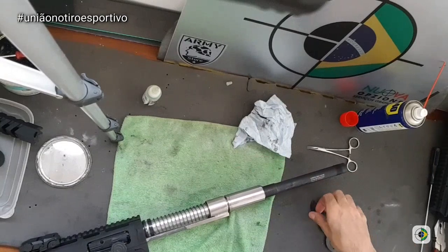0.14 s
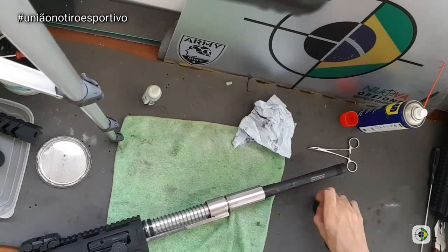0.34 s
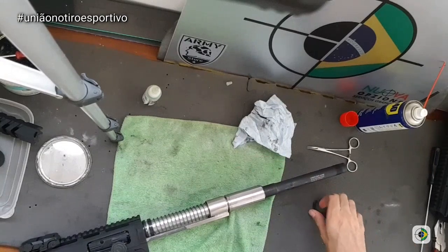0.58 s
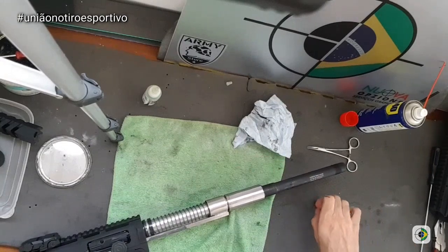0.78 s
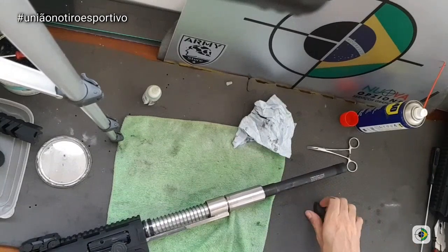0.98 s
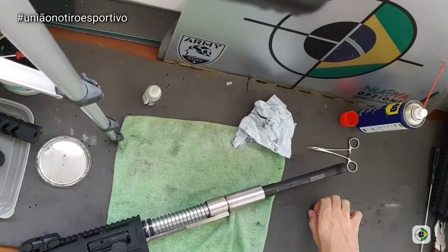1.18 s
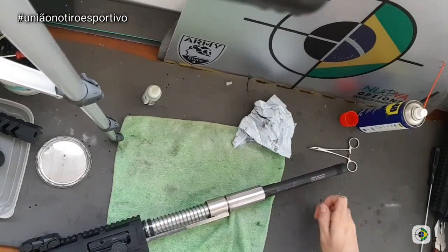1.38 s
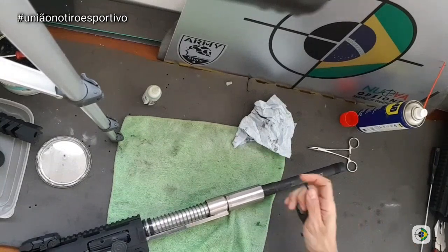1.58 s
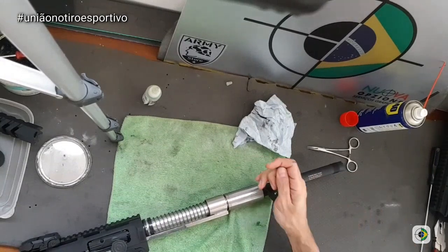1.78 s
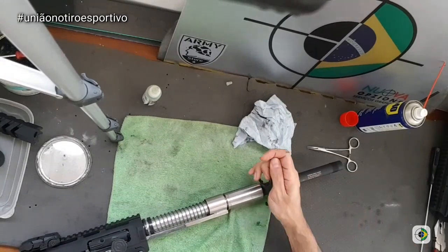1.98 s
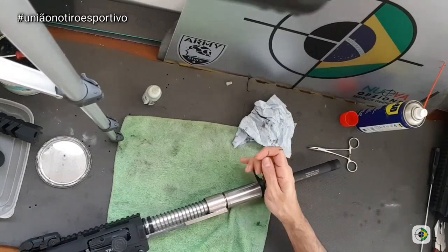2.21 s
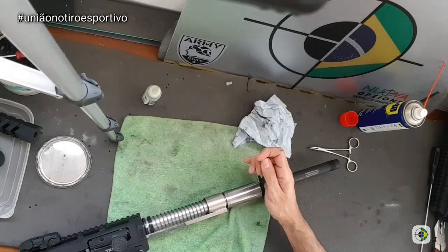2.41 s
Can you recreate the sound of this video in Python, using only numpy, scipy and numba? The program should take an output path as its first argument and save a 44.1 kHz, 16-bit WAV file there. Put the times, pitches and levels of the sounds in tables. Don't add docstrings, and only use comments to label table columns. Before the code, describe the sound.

Metal part slid and knocked on a bench, then clattered onto a steel tube with sharp clicks

```python
import sys
import numpy as np
from scipy import signal
from scipy.fft import rfft, irfft
from scipy.io import wavfile
from scipy.ndimage import uniform_filter1d
from numba import njit

SR = 44100
rng = np.random.default_rng(int(sys.argv[2]) if len(sys.argv) > 2 else 0)


def how_loud(loudness_db):
    steps = np.asarray(loudness_db, float) / 20
    return 10 ** steps


def master_out(mix):
    frames = np.transpose(np.atleast_2d(mix))
    ceiling = np.clip(frames, -1, 1)
    pcm = np.round(ceiling * 32767).astype(np.int16)
    wavfile.write(sys.argv[1], SR, pcm)


N = 108045


def level(x, db):
    return x * how_loud(db) / np.sqrt(np.mean(x ** 2) + 1e-30)


def line(table, col):
    table = np.array(table)
    return np.interp(np.arange(N) / SR, table[:, 0], table[:, col])


def colour(x, points):
    n = x.shape[-1]
    p = np.array(points)
    hz = np.arange(n // 2 + 1) * SR / n + 1
    db = np.interp(np.log(hz), np.log(p[:, 0]), p[:, 1])
    db = db - 18 * np.maximum(np.log2(p[0, 0] / hz), 0)
    return irfft(rfft(x) * how_loud(db), n)


def ring(x, hz, t60):
    p = np.exp(2j * np.pi * hz / SR - np.log(1000) / (max(t60, .01) * SR))
    return signal.lfilter([0, p.imag], [1, -2 * p.real, abs(p) ** 2], x + 1e-12)


@njit
def svf(x, hz, width):
    y, b, l = np.empty(len(x)), 0., 0.
    for i in range(len(x)):
        g, k = np.tan(np.pi * hz[i] / SR), width / hz[i]
        v = (b + g * (x[i] - l)) / (1 + g * (g + k))
        b, l, y[i] = 2 * v - b, l + 2 * g * v, k * v
    return y


def walk(rate):
    k = int(SR / rate)
    held = np.repeat(rng.standard_normal(N // k + 1), k)[:N]
    return 1.5 * uniform_filter1d(uniform_filter1d(held, k), k)


def phone_hiss():
    # f/Hz, level/dB
    hiss_tone = [(200, 4.5), (600, -10), (1900, -10.5), (5000, -16), (6800, -11), (8300, -21), (10500, -11),
                 (15500, -8)]
    hiss = colour(rng.standard_normal((2, N)), hiss_tone)
    return level(hiss, -58.5) * how_loud(0.6 * walk(6.95))


def room(x):
    t60_s, build_up_s, top_hz = 0.26, 0.0008, 9000
    t = np.arange(SR // 2) / SR
    tail = rng.standard_normal((2, len(t))) * how_loud(-60 * t / t60_s) * (1 - np.exp(-t / build_up_s))
    tail = signal.lfilter(*signal.butter(1, top_hz, fs=SR), tail)
    tail = tail / np.sqrt(np.sum(tail ** 2) / 2)
    return signal.fftconvolve(x[None], tail, axes=1)[:, :N]


def squeak():
    middle_s, length_s, width_hz = 1.4, 0.065, 600.
    t = np.arange(N) / SR
    pitch_hz = np.full(N, 3420.)
    tone = svf(svf(rng.standard_normal(N), pitch_hz, width_hz), pitch_hz, width_hz)
    return level(tone, -66.5) * np.exp(-np.minimum(((t - middle_s) / length_s) ** 4, 20))


def ticks():
    # t/s, level/dB
    grains = [
        (.338, -52),
        (0.388, -51),
        (0.399, -61),
        (0.845, -51),
        (0.991, -56),
    ]
    decay_s = 0.0082
    t = np.arange(N) / SR
    bursts = 0
    for s, db in grains:
        bursts = bursts + (t > s) * np.exp(-np.minimum(abs(t - s) / decay_s, 20)) * how_loud(db)
    noise = colour(rng.standard_normal(N), [(900, -8), (4000, -7.5), (8000, -5.5), (15000, -11.0)])
    return level(noise, 0) * bursts


def slide():
    # t/s, rub level/dB, singing level over the rub/dB, singing f/Hz
    strokes = [(0.0, -68, 13, 1705), (0.116, -60.5, -31, 2020), (0.168, -56.5, 4, 2184),
               (0.232, -54, -13, 1704), (0.296, -78, -9, 2010), (0.406, -62, -2, 1910),
               (0.534, -83, -34, 2110), (0.554, -70.5, -25, 1920), (0.698, -51.5, 1.5, 2150),
               (0.746, -62, -11.5, 1760), (0.942, -70, -1, 1880), (1.01, -65, -2, 1980),
               (1.06, -59.5, -16, 2000), (1.09, -57.5, 3, 2020), (1.142, -54.5, -2.5, 2150),
               (1.2, -60.5, -29, 1980), (1.29, -98, 20.5, 2040), (1.396, -63.5, -9.5, 2060),
               (1.73, -87, -23, 1890), (1.846, -92, -4, 1645), (1.9, -91, 13, 1950)]
    # f/Hz, level/dB
    rub_tone = [(350, -88), (600, -20), (1320, -13.5), (2280, -5.5), (2640, -7.5), (6400, -5.5),
                (8630, -11), (12800, -9), (15500, -18)]
    sing_width_hz, lift_s, lift_fade_s = 580., 1.62, .05
    grit = how_loud(2 * walk(150))
    rub = level(colour(rng.standard_normal((3, N)) * grit, rub_tone), 4)
    sing_hz = np.clip(line(strokes, 3), 500, 6000)
    sing = svf(rng.standard_normal(N) * grit, sing_hz, sing_width_hz)
    sing = level(svf(sing, sing_hz, sing_width_hz), 0)
    press = how_loud(line(strokes, 1)) * np.clip((lift_s - np.arange(N) / SR) / lift_fade_s, 0, 1)
    shared = (rub[0] * 0.49 + sing * how_loud(line(strokes, 2))) * press
    wide = rub[1:] * 0.76 * press
    return shared, wide


def bench():
    # f/Hz, level/dB, time to fall 60 dB/s
    panel = [(32, -19, .3), (74, -1, .28), (112, -3, .18), (148, -2, .07), (170, -6, .07), (205, -6, .08),
             (240, -9, .08), (288, -13, .055), (330, -12, .09), (372, -12, .12), (413, -12, .14),
             (447, -11, .16)]
    # t/s, level/dB, judder f/Hz, length/ms
    bumps = [(0.038, -40.5, 86, 22.4), (0.046, -39, 177, 28.6), (.190, -36.5, 149, 36),
             (0.225, -33.5, 155, 28), (0.34, -36.5, 181, 14), (0.384, -19.5, 157, 40.3),
             (0.393, -17, 284, 11.2), (0.414, -31, 80, 27), (0.439, -39.5, 403, 14), (.458, -32.5, 138, 18),
             (.632, -28, 139.3, 22), (0.656, -26, 103.6, 15.7), (0.68, -30.5, 84, 22.4),
             (0.686, -37, 268, 32), (0.822, -28.5, 183, 18), (0.842, -24.5, 164, 14.5),
             (0.851, -20.5, 258, 14), (0.857, -26, 86.5, 9.8), (.866, -31.5, 174.5, 13.5),
             (0.873, -40, 429, 17.2), (0.879, -35, 217, 24.4), (0.891, -36.5, 109.4, 25.5),
             (.899, -39, 275, 13.3), (0.909, -36, 235, 15), (1.079, -34, 136, 17.8), (1.1, -24.5, 109, 8.8),
             (1.125, -37.5, 78, 22), (1.153, -41, 160, 11), (1.441, -46, 140.7, 39),
             (1.865, -44, 109, 25.6), (2.092, -51, 122, 41), (2.233, -45, 74, 12), (2.324, -47, 72, 13)]
    # t/s, level/dB
    weight = [(0.0, -33.5), (0.1, -50.5), (0.2, -45.5), (0.7, -48.5), (0.79, -38), (0.91, -49.5),
              (1.33, -44.5), (1.47, -46), (1.66, -52.5), (1.86, -58.5), (2.11, -53), (2.45, -47.5)]
    shudder_hz, shudder_rise_s, shudder_t60_s = 308, .012, 0.21
    scatter_db, lean_tilt_db_oct = 2, -12
    t = np.arange(N) / SR
    pushes, after = [], 0
    for s, db, rate_hz, ms in bumps:
        u = np.clip((t - s) / (max(ms, 3) / 1000), 0, 1)
        swell = np.abs(np.sin(np.pi * u ** .5)) ** .3
        pushes.append(swell * np.sin(2 * np.pi * rate_hz * (t - s)) * how_loud(db) * 200 / SR)
        rise = np.clip((t - s) / shudder_rise_s, 0, 1)
        fall_db = np.maximum(-60 * (t - s) / shudder_t60_s, -200) * (t > s)
        after = after + rise * how_loud(db + fall_db) * (rate_hz / 170) ** 2
    pushes = np.array(pushes)
    chance = rng.standard_normal((len(bumps), len(panel)))
    boom, lean = 0, 0
    for m, (hz, db, t60) in enumerate(panel):
        force = how_loud(scatter_db * chance[:, m]) @ pushes
        sign = 1 if hz < 220 else (-1) ** (m + 1)
        boom = boom + sign * how_loud(db) * ring(force, hz, t60)
        unsteady = rng.standard_normal(N) * how_loud(2.75 * walk(19))
        lean_db = db + lean_tilt_db_oct * np.log2(max(hz / 112, 1))
        lean = lean + how_loud(lean_db) * ring(unsteady, hz, t60)
    shudder = colour(rng.standard_normal(N), [(shudder_hz / 2, 0), (shudder_hz, 0), (460, -6), (600, -26),
                                              (1200, -30), (2200, -34), (3000, -45)])
    return boom + level(lean, 0) * how_loud(line(weight, 1)) + level(shudder, -23.5) * after


def tube():
    # f/Hz, level/dB, time to fall 60 dB/s
    steel_tones = [(548, -17, .12), (872, -14, .04), (1100, -10, .015), (1280, -3, .03), (1378, -4, .025),
                   (1520, -10, .03), (1620, -9, .022), (1770, -11, .022), (2240, -7, .02), (2380, -6, .02),
                   (2815, -10, .025), (3065, -12, .025), (3750, -11, .015), (4090, -8, .015),
                   (4600, -14, .015), (5140, -15, .05), (5790, -12, .04), (6300, -17, .015),
                  (6940, -16, .02), (7600, -21, .012), (8650, -21, .015), (9300, -19, .015),
                  (10490, -15, .035), (11080, -15, .035), (11500, -17, .025), (12000, -15, .025),
                  (13300, -17, .015), (14300, -15, .025)]
    # t/s, level/dB, strongest f/Hz, rattle after it/dB, rattle decay/s
    strikes = [(1.926, -27, 2470, -22, 0.14), (1.927, -39.5, 4000, -16, .06), (1.937, -31, 1390, -30, 0.12),
               (1.944, -33.5, 2350, -28, .08), (1.953, -32.5, 1000, -33, 0.07),
               (1.955, -32.5, 1290, -25, 0.071), (1.977, -33.5, 2800, -21, 0.23),
               (1.985, -44, 1740, -35, .12), (1.995, -48, 2050, -24, 0.14), (2.016, -51, 1950, -28, 0.09),
               (2.104, -28.5, 3170, -32, 0.081), (2.106, -28.5, 1450, -51, 0.13),
               (2.113, -38.5, 1680, -35, 0.083), (2.124, -38, 3030, -17, 0.12),
               (2.147, -36.5, 1310, -23, 0.1), (2.158, -35, 6200, -18, 0.19),
               (2.166, -40.5, 1340, -31, 0.044), (2.176, -40.5, 5790, -26, .08),
               (2.250, -36, 10500, -14, 0.05), (2.255, -30.5, 6800, -23, 0.092),
               (2.258, -39, 1290, -39, 0.033), (2.272, -39, 6600, -6, .06), (2.298, -28, 5050, -19, 0.092),
               (2.299, -30.5, 1150, -34, 0.066), (2.301, -34.5, 11600, -14, 0.17),
               (2.303, -35, 1650, -27, 0.2), (2.317, -39.5, 1450, -23, 0.074), (2.331, -45, 4570, -25, .08),
               (2.34, -39.5, 1360, -22, 0.11), (2.357, -48.5, 1530, -29, .12)]
    # f/Hz, level/dB
    crack_tone = [(900, -12), (1400, -4), (2400, 0), (4300, 0), (6000, -2), (8000, -7), (11500, 0),
                  (15500, 0)]
    crack_s, contact_s, lead_s = 0.0037, .0012, .01
    rattle_per_s, rattle_spread_db, rattle_dry_db, rattle_ring_db = 4000, 3, 19.5, -6
    focus_db_oct, crack_focus, splash_db, focus_floor_db = 7, .7, -12, -15
    scatter_db, strike_detune = 1.5, .008
    steel = steel_tones
    size = 12288
    u = np.arange(size) / SR - lead_s
    out = np.zeros(N + size)
    for s, db, top_hz, tail_db, tail_s in strikes:
        chance = rng.standard_normal((2, len(steel)))
        noise = rng.standard_normal((4, size))

        def focus(hz):
            return -focus_db_oct * np.log2(hz / top_hz) ** 2

        hits = abs(noise[0]) < rattle_per_s / SR * np.sqrt(np.pi / 2)
        rattle = hits * noise[1] * how_loud(rattle_spread_db * noise[2])
        fall_db = np.minimum(60 * abs(u) / max(tail_s, .005), 200)
        tail = rattle * (u > 0) * how_loud(tail_db - fall_db)

        v = np.clip(u / crack_s, 0, 20)
        crack = noise[3] * np.sqrt(v) * np.exp(-2 * v) * how_loud(10) + how_loud(rattle_dry_db) * tail
        tone = [(hz, tone_db + max(crack_focus * focus(hz), splash_db)) for hz, tone_db in crack_tone]
        hit = colour(crack, tone)

        knock = np.maximum(1 - abs(u - contact_s / 2) * SR, 0)
        scuff = noise[1] * (u > 0) * (u < contact_s) / np.sqrt(contact_s * SR)
        force = knock + 0.31 * scuff + how_loud(rattle_ring_db) * tail
        for m, (hz, mode_db, t60) in enumerate(steel):
            gain = how_loud(mode_db + max(focus(hz), focus_floor_db) + scatter_db * chance[0, m])
            hit = hit + (-1) ** m * gain * ring(force, hz * (1 + strike_detune * chance[1, m]), t60)
        i = int((s - lead_s) * SR)
        out[i:i + size] += how_loud(db + 0.6) * hit[:N + size - i]
    return out[:N]


def scene():
    left_db, left_lead_s = 2.1, 0.000115
    boom = bench()
    rub, rub_wide = slide()
    bright = tube() + ticks() + rub + squeak()
    near = boom + bright
    hz = np.arange(N // 2 + 1) * SR / N
    late = irfft(rfft(near) * np.exp(-2j * np.pi * hz * left_lead_s), N)
    echo = room(how_loud(-4) * bright + how_loud(-19.5) * boom)
    out = np.array([near, late]) + echo + rub_wide + phone_hiss()
    return out * how_loud(np.array([[left_db], [-left_db]]) / 2)


def low_pass(x):
    return signal.sosfilt(signal.butter(12, 15670, fs=SR, output="sos"), x)


def record(dry):
    low_cut_hz, top_hz = 35, 15500
    x = signal.sosfilt(signal.butter(1, low_cut_hz, "high", fs=SR, output="sos"), dry)
    x = signal.sosfilt(signal.ellip(10, .2, 70, top_hz, fs=SR, output="sos"), x)
    return low_pass(x)


dry = scene()
out = record(dry)
master_out(out)
```